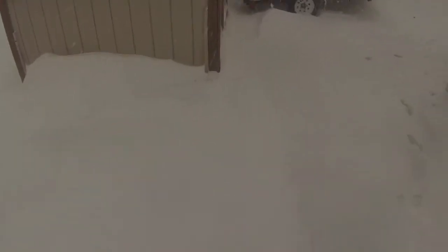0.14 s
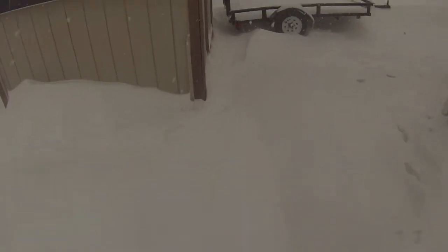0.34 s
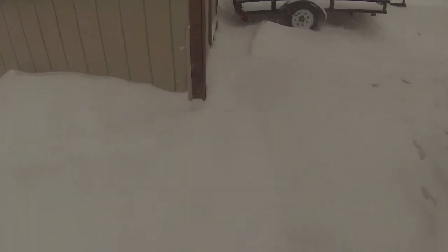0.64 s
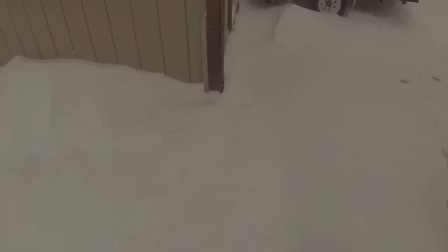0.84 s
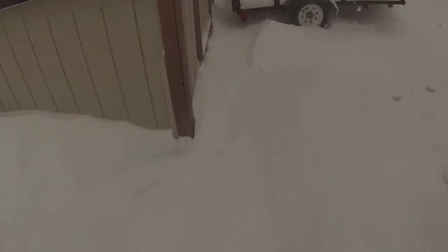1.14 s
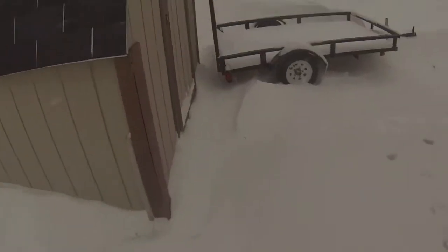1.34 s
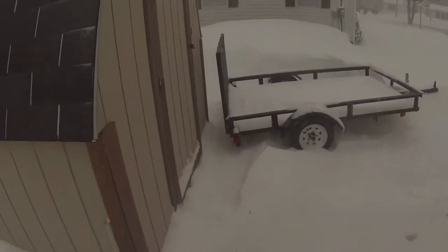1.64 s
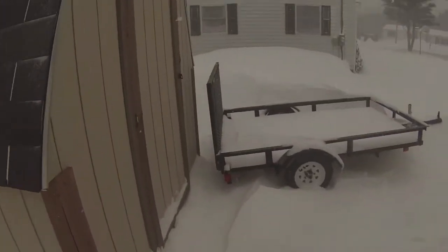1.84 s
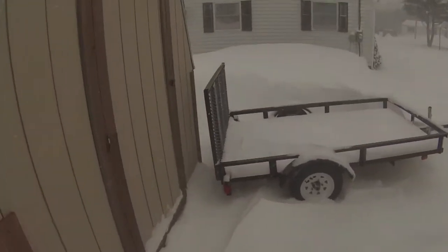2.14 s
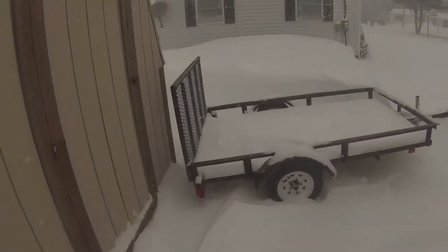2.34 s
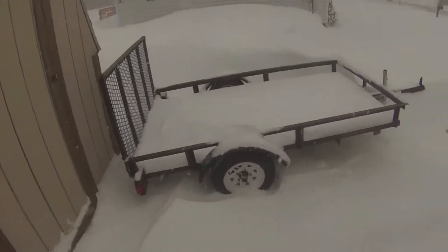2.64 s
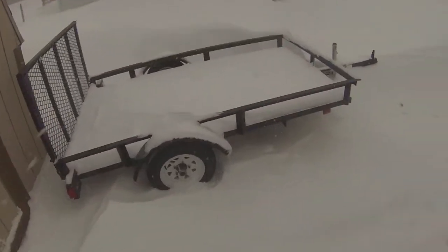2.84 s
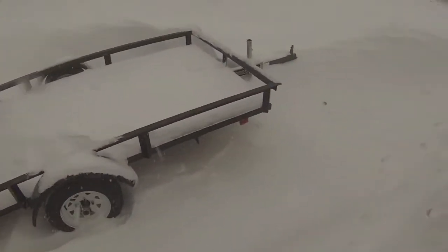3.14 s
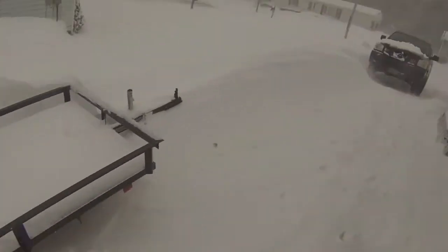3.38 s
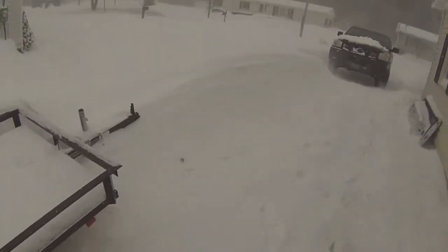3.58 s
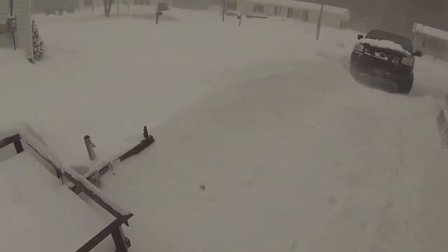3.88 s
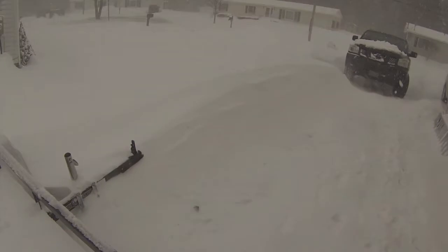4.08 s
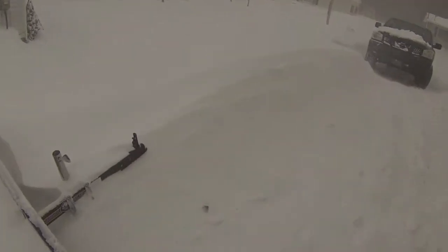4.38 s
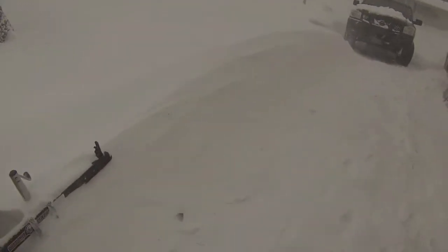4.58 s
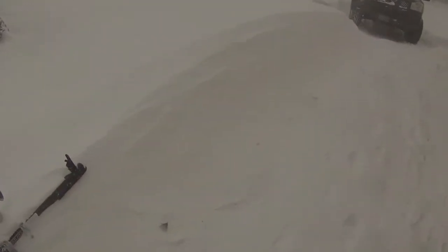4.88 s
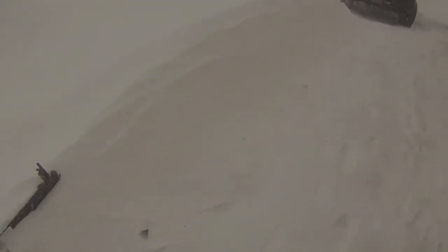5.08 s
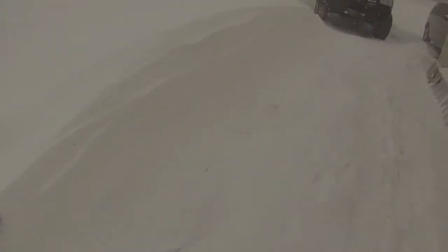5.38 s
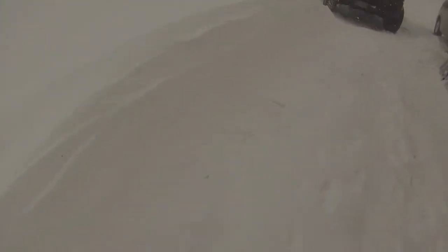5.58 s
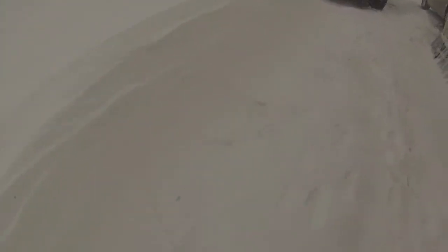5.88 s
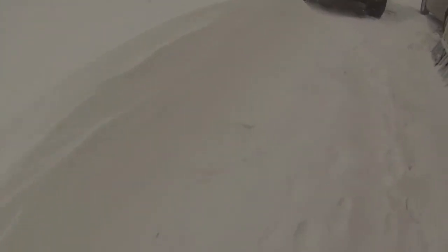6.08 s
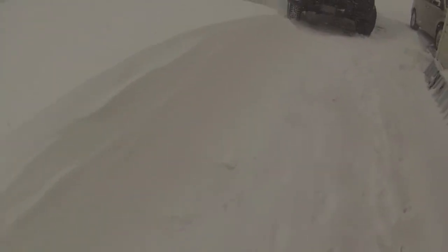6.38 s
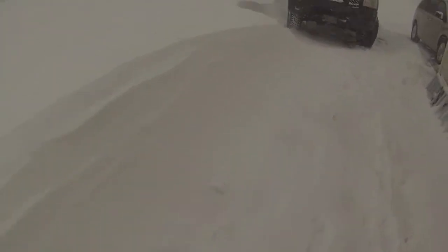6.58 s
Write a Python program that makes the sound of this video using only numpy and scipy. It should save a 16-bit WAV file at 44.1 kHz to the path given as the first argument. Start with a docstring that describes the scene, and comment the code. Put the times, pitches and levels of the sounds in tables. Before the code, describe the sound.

Blizzard wind roars and thumps on a close microphone while someone trudges through dry, crusty snow, with crunches, sharp cracks and tiny ticks.

```python
"""Someone trudges through drifted snow in a blizzard, holding a small camera.
At first the wind is strong: filtered noise roars and rushes while bent low tones thump on the microphone.
Dry snow crunches and sprays as clumped random clicks, crust cracks as short noise bursts, and flakes tick.
Between about 1 and 2 s a small metal piece, perhaps a zip pull, tinks four times as a fading pure tone.
From about 3 s wind and crunches are mostly softer, the biggest thump comes near 4 s, and wind rises at the end."""
import sys
import numpy as np
from scipy import signal
from scipy.fft import rfft, irfft, next_fast_len
from scipy.io import wavfile
from scipy.ndimage import uniform_filter1d

SR = 44100
rng = np.random.default_rng(int(sys.argv[2]) if len(sys.argv) > 2 else 0)


def log_audio(samples):
    """Write samples as a 16-bit WAV file to the path given in sys.argv[1]."""
    # one column per channel
    frames = np.atleast_2d(samples).T
    # limit to full scale, then quantise
    limited = np.clip(frames, -1, 1)
    pcm = np.round(limited * 32767).astype(np.int16)
    wavfile.write(sys.argv[1], SR, pcm)


N = 296352
TIME = np.arange(N) / SR  # seconds

# Levels in these tables are relative: each source adds its own trim in dB.
# buffets of air on the microphone, the strong ones about a stride apart:
# (time [s], level [dB], pitch at the middle [Hz], half length [s])
BUFFET_HITS = [(0.005, -19, 43.6, 0.0086), (0.071, -18.5, 49.6, 0.0081), (0.493, -10.5, 45.3, 0.013),
               (0.635, -16, 50, 0.0062), (0.674, -18, 48, 0.015), (1.293, -21.5, 43.4, 0.0081),
               (1.383, -23.5, 37.3, .011), (1.841, -12, 32.8, 0.021), (1.952, -21.5, 39.4, 0.01),
               (2.312, -17, 45.3, 0.016), (2.656, -27, 48.5, 0.017), (2.97, -27, 42, 0.015),
               (3.025, -14.5, 39.4, 0.013), (3.562, -10.5, 42.7, 0.011), (4.111, -7.5, 35.3, 0.0098),
               (4.666, -12.5, 41.5, 0.0086), (4.744, -20, 45.4, 0.011), (5.34, -20, 45.7, .007),
               (5.958, -10.5, 42.8, 0.011), (6.051, -22.5, 34, 0.0095), (6.613, -16.5, 43.7, 0.014),
               (6.649, -17, 44.5, 0.01)]
# single cracks of snow crust: (time [s], level [dB], treble against body [dB], pitch [Hz])
CRUST_CRACKS = [(0.024, -29, -20, 1530), (0.0894, -27, -17, 1690), (0.1222, -31, -13, 2070),
                (0.218, -24.5, -28, 1470), (0.2717, -25.5, -19, 1480), (0.404, -28, -12, 1730),
                (0.4727, -27.5, -12.5, 1430), (0.852, -33, -35, 1840), (0.93, -15, -25.5, 1580),
                (1.044, -29.5, -26, 1960), (1.3306, -33, -11.5, 1480), (1.4083, -26.5, -32, 1840),
                (2.2768, -19, -19.5, 1530), (2.318, -30.5, -20.5, 1600), (2.367, -26.5, -17, 1450),
                (2.509, -30, -30, 1790), (2.5389, -25.5, -35, 1430), (2.6295, -27.5, -22, 1830),
                (2.83, -41.5, -5, 2020), (2.874, -29.5, -18, 1600), (3.092, -46, -2.5, 1630),
                (3.1594, -31.5, -31, 1430), (3.724, -33, -33, 1580), (3.7916, -31, -23, 1590),
                (4.1416, -30, -24, 1900), (4.183, -29, -20, 1710), (4.229, -42, -12, 1920),
                (4.548, -29, -28, 2250), (4.5603, -40.5, -12, 1570), (4.9452, -42.5, -7, 2010),
                (5.442, -31.5, -31, 2000), (5.5105, -31.5, -16, 1490), (5.602, -31, -18, 1900),
                (5.742, -34, -26, 2530), (5.8234, -34, -20, 1950), (5.8604, -46.5, -2, 1680),
                (5.971, -32, -18, 1936), (6.045, -38, -15, 1960), (6.3061, -31.5, -23, 1500),
                (6.343, -51.5, 2, 2540), (6.362, -32.5, -26, 1800), (6.539, -31, -29, 1950),
                (6.597, -28, -40, 2430)]
# range of pitch in the body of a crack, which has almost no bass: (low edge [Hz], high edge [Hz])
CRACK_BODY_RANGE = (1150, 2900)
# snow gives way underfoot or brushes the coat:
# (start [s], length before dying away [s], coarse crunch level [dB], fine powder level [dB])
SNOW_CRUNCHES = [(0.007, 0.042, -47, -47), (0.072, 0.13, -44, -48), (0.216, 0.058, -40, -42.5),
                 (0.31, 0.14, -47, -51), (0.445, 0.14, -41.5, -48.5), (0.604, 0.079, -38, -42.5),
                 (0.658, 0.37, -43.5, -48.5), (1.07, 0.041, -42.5, -52.5), (1.134, 0.1, -49, -53.5),
                 (1.177, 0.084, -45.5, -49.5), (1.301, 0.11, -44, -53), (1.474, 0.051, -51, -59),
                 (1.668, 0.1, -45.5, -55.5), (1.799, .09, -42.5, -48.5), (1.993, 0.098, -43.5, -51),
                 (2.11, 0.069, -39.5, -50.5), (2.248, 0.076, -41.5, -50), (2.351, 0.099, -41, -48.5),
                 (2.605, 0.14, -44, -55.5), (2.787, 0.091, -47.5, -55.5), (3.031, 0.069, -49, -54),
                 (3.266, 0.11, -58, -63), (3.713, 0.044, -57, -55.5), (3.782, 0.079, -46, -52),
                 (3.894, 0.088, -63, -62.5), (4.126, 0.057, -53, -54), (4.454, 0.12, -54, -63),
                 (4.647, 0.082, -41.5, -47), (4.735, 0.029, -51, -57), (4.931, 0.041, -50, -51.5),
                 (5.129, 0.056, -55, -56), (5.182, 0.056, -52, -52), (5.344, 0.41, -54, -56),
                 (5.838, 0.17, -52.5, -55.5), (6.01, 0.14, -57.5, -64.5), (6.312, 0.073, -55, -57),
                 (6.498, 0.11, -47, -51.5), (6.665, .05, -59, -49)]
# tone balance of coarse crunching snow: (frequency [Hz], level [dB])
CRUNCH_TONE = [(300, 1), (900, -16), (1200, 5), (1500, 3.5), (2000, 7.5), (2800, -8), (3600, -11.5),
               (5000, -25), (8000, -30), (15000, -28)]
# tone balance of fine powder, also used for the treble of cracks: (frequency [Hz], level [dB])
POWDER_TONE = [(1000, -24.5), (2500, 5), (4000, 2), (5500, 0.5), (7500, 1), (8800, -6.5), (10200, -3),
               (11300, -3.5), (12800, -6), (15000, -16)]
# strength of the wind, which drives roar, rush and drifting snow: (time [s], level [dB])
WIND_STRENGTH = [(0.0, -45), (0.2, -48), (0.3, -52), (0.44, -43.5), (0.56, -51.5), (1.0, -51.5),
                 (1.6, -52.5), (1.77, -46.5), (2.05, -44.5), (2.4, -43), (2.57, -50), (2.84, -48.5),
                 (3.15, -59), (3.21, -60.5), (3.73, -60.5), (3.79, -47.5), (3.93, -57), (4.02, -53.5),
                 (4.12, -54.5), (4.3, -62), (4.58, -58.5), (4.72, -55.5), (5.03, -58), (5.14, -54.5),
                 (5.23, -56.5), (5.36, -55.5), (6.2, -59), (6.5, -59), (6.72, -50)]
# tone balance of the rushing air: (frequency [Hz], level [dB])
RUSH_TONE = [(200, -19.5), (450, -3), (750, 2), (1020, 0.5), (1200, 3), (1550, -1.5), (2000, -4.5),
             (2300, -2.5), (2600, -2.5), (3200, -12.5), (7000, -19.5), (15000, -71)]
# cavity that the wind blows across: (frequency [Hz], width [Hz], lift at the strongest rush before waver [dB])
BLOWN_CAVITY = [(1259, 59, 12), (1430, 78, 0.5)]
# tone balance of the low roar: (frequency [Hz], level [dB])
ROAR_TONE = [(55, -12.5), (100, 5), (140, 4), (200, -1.5), (300, -4), (400, -6.5), (550, -12), (900, -18.5),
             (2000, -62.5)]
# turbulence on the microphone between the buffets: (time [s], level [dB])
RUMBLE_STRENGTH = [(0.0, -40), (0.94, -42), (1.26, -34), (1.64, -40.5), (2.4, -31.5), (2.58, -40.5),
                   (3.12, -35.5), (3.22, -48.5), (3.5, -50), (3.7, -33), (4.26, -35), (4.38, -50),
                   (4.56, -48.5), (4.85, -35), (5.02, -43.5), (5.16, -34), (5.27, -41.5), (5.55, -33),
                   (6.26, -45.5), (6.44, -36.5), (6.72, -36.5)]
# tone balance of that turbulence: (frequency [Hz], level [dB])
RUMBLE_TONE = [(10, -26.5), (21, -2.5), (33, 1.5), (48, 0), (64, -5), (84, -20.5), (120, -36.5), (200, -52),
               (400, -65)]
# bands in which a flake ticks on the camera body: (frequency [Hz], width [Hz], level [dB])
FLAKE_BANDS = [(1670, 2000, -29), (2420, 370, 4), (4320, 330, 1), (5070, 3100, -25), (8200, 1300, -0.5),
               (11640, 720, -4.5), (12600, 4000, -9)]
# metal tinks: (time [s], level at the start [dB], pitch [Hz])
METAL_TINKS = [(0.899, -48, 5220), (1.201, -36, 4330), (1.21, -43, 4320), (2.163, -34.5, 5200)]
# cavities of the housing in front of the microphone: (frequency [Hz], width [Hz], lift [dB])
HOUSING_CAVITIES = [(1506, 168, 5.5), (1910, 140, 3), (2523, 17, 7), (2960, 59, 4.5), (4270, 57, 5.5),
                    (4980, 180, 4.5), (10740, 320, 3)]

# a crunch builds quickly, sags while the snow packs, then dies away; the powder settles sooner
CRUNCH_ATTACK_S, CRUNCH_RELEASE_S, POWDER_RELEASE_S = 0.023, 0.025, 0.011
CRUNCH_SAG_DB_PER_S = 8
# snow that drifts past all the time: level at mean wind before trim, and share of the wind's swing it follows
DRIFT_COARSE_DB, DRIFT_COARSE_FOLLOWS = -57, 1
DRIFT_FINE_DB, DRIFT_FINE_FOLLOWS = -65, 0.18


def buffets(level_db, lag, sharpness):
    """An eddy swings the pressure down and up; the microphone's lag makes each thump start fast and slow down."""
    out = np.zeros(N)
    for start, db, hz, half in BUFFET_HITS:
        t = TIME - start
        # bend time so that the swing slows as it goes on
        bent = np.log(np.maximum(1 + lag * t / half, 1e-6)) * half / lag
        swell = 1 / np.cosh(sharpness * bent / half)
        out += from_db(db + level_db) * np.sin(2 * np.pi * hz * bent) * swell
    return out


def cracks(body_db, treble_db, body_peak_s, treble_peak_s, edge_hz):
    """Crust gives way in a burst of fractures a few milliseconds long, each with a rough pitch."""
    body, edge = np.zeros(N), np.zeros(N)
    t = np.arange(SR // 30) / SR
    # each burst rises to its peak and then fades
    body_shape = t / body_peak_s * np.exp(1 - t / body_peak_s)
    treble_shape = t / treble_peak_s * np.exp(1 - t / treble_peak_s)
    for start, db, share_db, hz in CRUST_CRACKS:
        first = int(start * SR)
        at = slice(first, first + len(t))
        coarse, fine = rng.standard_normal((2, len(t)))
        coarse = even(band(coarse, hz, width=1100), seconds=0.0025)
        body[at] += coarse * from_db(db + body_db) * body_shape
        edge[at] += fine * from_db(db + share_db + treble_db) * treble_shape
    body_filter = signal.butter(3, CRACK_BODY_RANGE, "band", fs=SR, output="sos")
    edge_filter = signal.butter(1, edge_hz, "high", fs=SR, output="sos")
    body = signal.sosfilt(body_filter, body + 1e-18)
    edge = signal.sosfilt(edge_filter, edge + 1e-18)
    return body + colour(edge, POWDER_TONE)


def snow(coarse_db, fine_db, crunch_db, powder_db, crunch_clump_db, powder_clump_db, shared):
    """Ice grains break in clumps, which the coarse crunch and the fine spray partly share."""
    clumps = 0.82 * wander(rate=29) + 0.6 * wander(rate=400)
    fine_clumps = shared * clumps + np.sqrt(1 - shared ** 2) * wander(rate=225)
    coarse = grains(per_s=12000, spread_db=4.0) * from_db(crunch_clump_db * clumps)
    fine = grains(per_s=20000, spread_db=5.0) * from_db(powder_clump_db * fine_clumps)
    coarse = even(coarse, seconds=0.029)
    fine = even(fine, seconds=0.054)
    crunch = colour(coarse * from_db(coarse_db + crunch_db), CRUNCH_TONE)
    powder = colour(fine * from_db(fine_db + powder_db), POWDER_TONE)
    return crunch + powder


def snow_levels():
    """Coarse and fine snow in dB: drifting snow follows the wind, with the crunches on top."""
    swing_db = wind_swing()
    # add up as power, since separate noises add that way
    coarse = from_db(DRIFT_COARSE_DB + DRIFT_COARSE_FOLLOWS * swing_db) ** 2
    fine = from_db(DRIFT_FINE_DB + DRIFT_FINE_FOLLOWS * swing_db) ** 2
    for start, length, coarse_db, fine_db in SNOW_CRUNCHES:
        at = slice(max(int(start * SR), 0), int((start + length) * SR) + SR // 4)
        t = TIME[at] - start
        sag_db = CRUNCH_SAG_DB_PER_S * (t - length / 2)
        coarse_shape = envelope(t, CRUNCH_ATTACK_S, length, CRUNCH_RELEASE_S)
        fine_shape = envelope(t, CRUNCH_ATTACK_S, length, POWDER_RELEASE_S)
        coarse[at] += (from_db(coarse_db - sag_db) * coarse_shape) ** 2
        fine[at] += (from_db(fine_db - sag_db) * fine_shape) ** 2
    return 10 * np.log10(coarse), 10 * np.log10(fine)


def rush(level_db, follows, buffet_db, flutter_db, cavity_growth, waver_db):
    """Fluttering air noise follows wind and buffets; blowing harder sounds the cavity more, in a wavering howl."""
    steady = from_db(level_db + follows * wind_swing())
    stirred = from_db(buffet_db) * wakes(rise_s=0.025, decay_s=0.076)
    gain = np.hypot(steady, stirred)
    db = 20 * np.log10(gain)
    flutter = from_db(flutter_db * wander(rate=22))
    air = colour(rms_one(rng.standard_normal(N) * flutter), RUSH_TONE)
    howl_db = cavity_growth * (db - db.max()) + waver_db * wander(rate=27)
    howl = (resonate(air, BLOWN_CAVITY) - air) * from_db(howl_db)
    return gain * (air + howl)


def roar(level_db, lump_db, buffet_db):
    """Mid-sized eddies give a lumpy low roar, which flares briefly with each buffet."""
    db, = in_time(WIND_STRENGTH)
    flare = from_db(buffet_db) * wakes(rise_s=0.021, decay_s=0.017)
    gain = np.hypot(from_db(db + level_db), flare)
    air = rms_one(rng.standard_normal(N) * from_db(lump_db * wander(rate=70)))
    return gain * even(colour(air, ROAR_TONE), seconds=0.18)


def rumble(level_db, wake_db, lump_db):
    """Smaller eddies roll over the microphone in lumps, and more strongly around a buffet."""
    db, = in_time(RUMBLE_STRENGTH)
    stirred = from_db(wake_db) * wakes(rise_s=0.049, decay_s=0.097)
    gain = np.hypot(from_db(db + level_db), stirred)
    lumps = from_db(lump_db * wander(rate=6.4))
    return gain * lumps * even(colour(rng.standard_normal(N), RUMBLE_TONE), seconds=0.072)


def puffs(level_db, hz, width, half_s, lag_s):
    """A buffet forces a short puff of air through the microphone port, louder when it is stronger."""
    flow = np.zeros(N)
    for start, db, _, _ in BUFFET_HITS:
        flow += from_db(db + level_db) * np.exp(-0.5 * ((TIME - start - lag_s) / half_s) ** 2)
    return flow * rms_one(band(rng.standard_normal(N), hz, width))


def flakes(fine_db, per_s, level_db, follow, spread_db, colour_db, decay_s):
    """Hard flakes tick on the camera, each in its own colour, louder when more snow flies."""
    count = 260  # equal time slots, each with a chance of one flake
    draws = rng.random((count, 2))
    at = ((np.arange(count) + draws[:, 0]) / count * (N - 1)).astype(int)
    lands = rng.random(count) < per_s * N / SR / count
    db = level_db + follow * (fine_db[at] - fine_db.mean()) + spread_db * draws[:, 1] ** 2
    out = np.zeros(N)
    for hz, width, mode_db in FLAKE_BANDS:
        own_db = colour_db * (2 * rng.random(count) - 2.0)
        hits = np.zeros(N)
        hits[at] = lands * from_db(db + mode_db + own_db)
        burst = signal.lfilter([1], [1, -np.exp(-1 / (decay_s * SR))], hits + 1e-18)
        same_power = np.sqrt(SR / np.pi / width)  # at any width
        out += band(burst * rng.standard_normal(N), hz, width) * same_power
    return out


def tinks(t60):
    """A small piece of metal rings on one pitch, fading by 60 dB in t60 seconds."""
    out = np.zeros(N)
    for start, db, hz in METAL_TINKS:
        t = np.clip(TIME - start, 0, 1)
        out += from_db(db - 60 * np.minimum(t / t60, 3)) * np.sin(2 * np.pi * hz * t)
    return out


def wakes(rise_s, decay_s):
    """Gain of the air stirred by the buffets: it swells up to each one and dies away after it."""
    start, db, _, _ = np.transpose(BUFFET_HITS)
    coarse_time = TIME[::40]  # a slow curve needs few points
    t = coarse_time - start[:, None]
    gain = from_db(db)[:, None] * np.exp(-np.maximum(-t / rise_s, t / decay_s))
    return np.interp(TIME, coarse_time, np.sqrt(np.sum(gain ** 2, axis=0)))


def wind_swing():
    """How far the wind is above or below its mean, in dB."""
    db, = in_time(WIND_STRENGTH)
    return db - db.mean()


def envelope(t, attack_s, hold_s, release_s):
    """Gain that rises from time zero, stays up until hold_s, and then dies away."""
    return np.clip(t / attack_s, 0, 1) * np.exp(-np.maximum(t - hold_s, 0) / release_s)


def grains(per_s, spread_db):
    """Random clicks, many small and a few large."""
    sizes = from_db(spread_db * np.minimum(rng.exponential(1, N), 5))
    return rms_one((rng.random(N) < per_s / SR) * sizes * rng.choice([-1, 1], N))


def wander(rate):
    """Smooth random curve with spread 1, changing about rate times a second."""
    hz = np.arange(N // 2 + 1) * SR / N
    return rms_one(irfft(rfft(rng.standard_normal(N)) / (1 + (hz / rate) ** 4), N))


def colour(x, points):
    """Filter that gives a tone balance without sounding early, and keeps the power of white noise."""
    size = next_fast_len(N + SR // 2) // 2 * 2
    table_hz, db = np.transpose(points)
    hz = np.arange(size // 2 + 1) * SR / size
    gain = rms_one(from_db(np.interp(np.log(hz + 1), np.log(table_hz), db)))
    # fold the cepstrum (spectrum of the log gain) so that the filter only rings after its input
    cepstrum = irfft(np.log(gain))
    cepstrum[1:size // 2] *= 2
    cepstrum[size // 2 + 1:] = 0
    return irfft(rfft(x, size) * np.exp(rfft(cepstrum)))[:N]


def band(x, hz, width):
    """One resonance with a gain of about 1 on top."""
    r = np.exp(-np.pi * width / SR)
    poles = [1, -2 * r * np.cos(2 * np.pi * hz / SR), r * r]
    return signal.lfilter([1, 0, -1], poles, x + 1e-18) * (1 - r * r) / 2


def resonate(x, modes):
    """Each cavity in turn lifts a narrow band."""
    for hz, width, lift_db in modes:
        x = x + (from_db(lift_db) - 1) * band(x, hz, width)
    return x


def even(x, seconds):
    """Take the slow swells out of a noise, leaving its fine texture at rms 1."""
    return x / np.sqrt(uniform_filter1d(x ** 2, max(int(seconds * SR), 2)) + 1e-12)


def in_time(rows):
    """Each column of a table at every sample."""
    s, *columns = np.transpose(rows)
    return [np.interp(TIME, s, c) for c in columns]


def from_db(db):
    """Decibels to gain."""
    return 10 ** (np.asarray(db) / 20)


def rms_one(x):
    """Scale to an rms (average strength) of 1."""
    return x / np.sqrt(np.mean(x ** 2) + 1e-20)


def scene():
    """Wind and snow pass through the housing; thumps, rumble, ticks and tinks do not."""
    coarse_db, fine_db = snow_levels()
    pressure = buffets(level_db=1.0, lag=0.16, sharpness=1.2)
    pressure = pressure + rumble(level_db=0.5, wake_db=-19, lump_db=3.16)
    ice = cracks(body_db=-11.5, treble_db=9.5, body_peak_s=0.0016, treble_peak_s=0.00062, edge_hz=4200)
    ice = ice + snow(coarse_db, fine_db, crunch_db=-7.5, powder_db=-1.5,
                     crunch_clump_db=5.5, powder_clump_db=4.5, shared=0.85)
    wind = rush(level_db=-58.0, follows=0.86, buffet_db=-45.5,
                flutter_db=2.93, cavity_growth=0.77, waver_db=2.5)
    wind = wind + roar(level_db=0.5, lump_db=2.5, buffet_db=-36.0)
    wind = wind + puffs(level_db=-50, hz=2460, width=370, half_s=0.045, lag_s=0.015)
    ticks = flakes(fine_db, per_s=32, level_db=-52, follow=0.55, spread_db=13, colour_db=7, decay_s=0.0009)
    housed = resonate(wind + ice, HOUSING_CAVITIES)
    return (housed + ticks + tinks(t60=0.034) + pressure)[None]


def record(dry):
    """Cut the treble steeply above 15400 Hz."""
    return signal.sosfilt(signal.ellip(10, 0.2, 80, 15400, fs=SR, output="sos"), dry)


dry = scene()
out = record(dry)
log_audio(out)
```